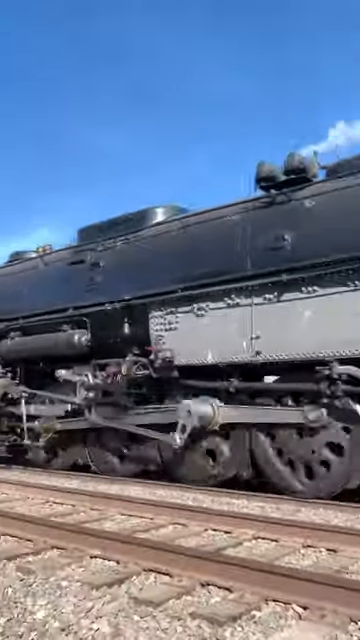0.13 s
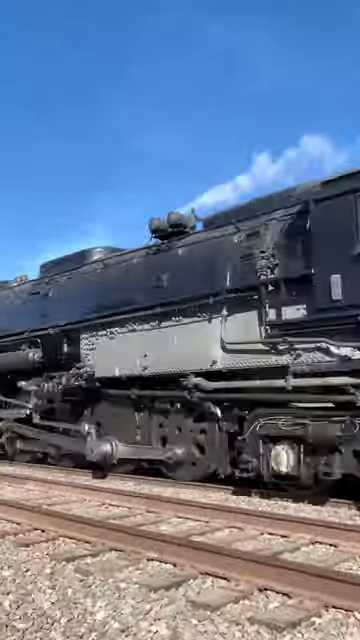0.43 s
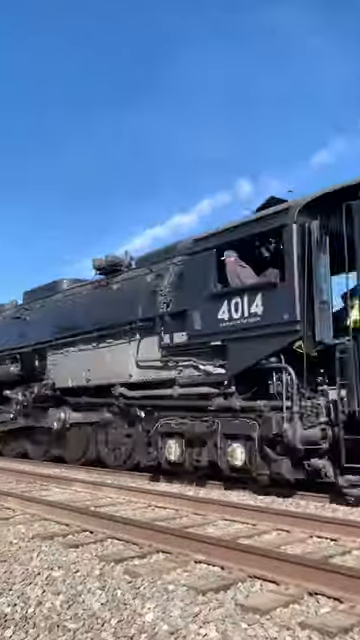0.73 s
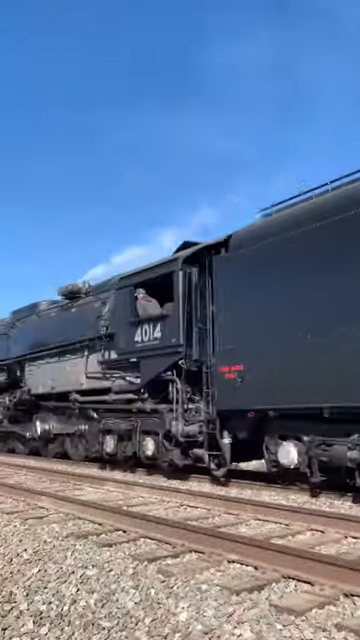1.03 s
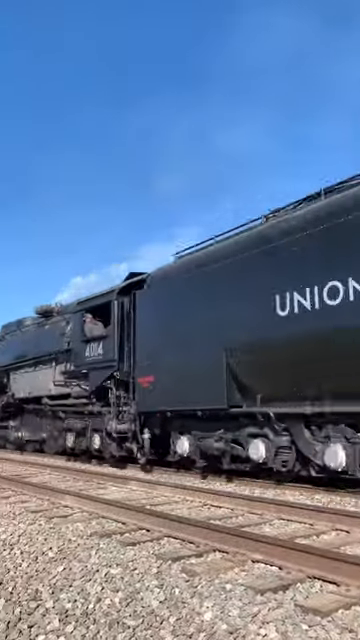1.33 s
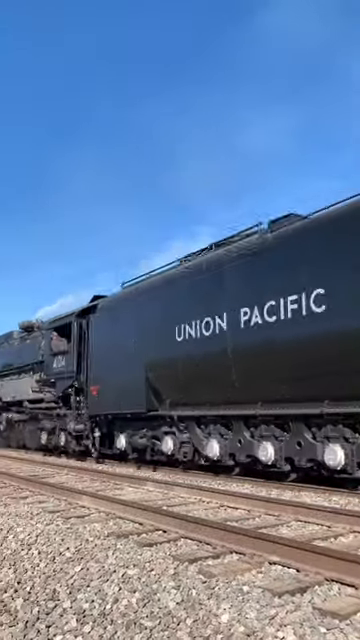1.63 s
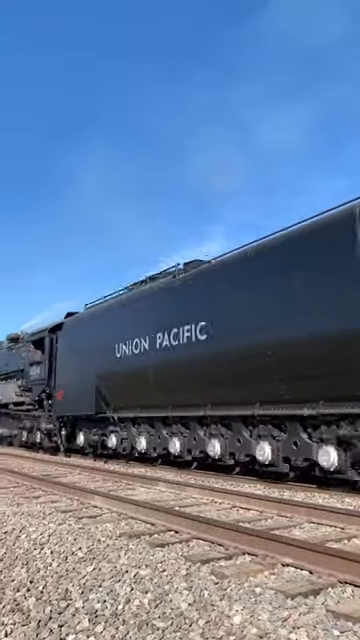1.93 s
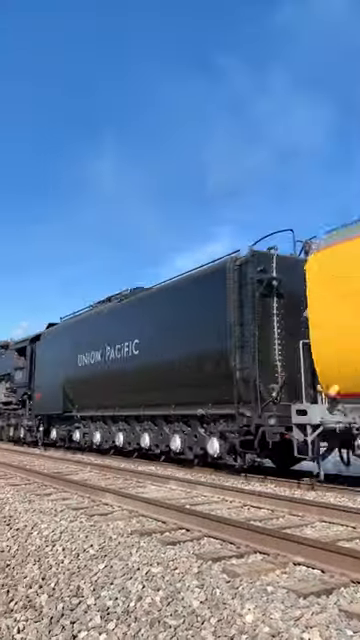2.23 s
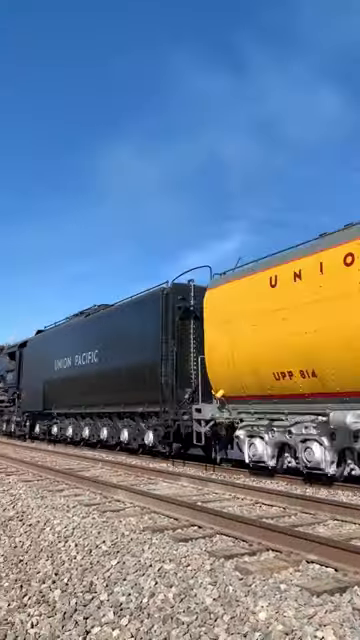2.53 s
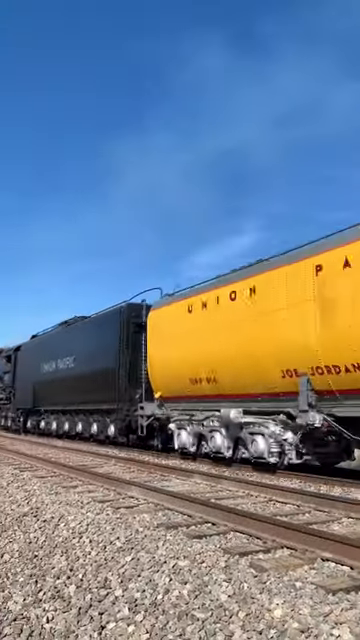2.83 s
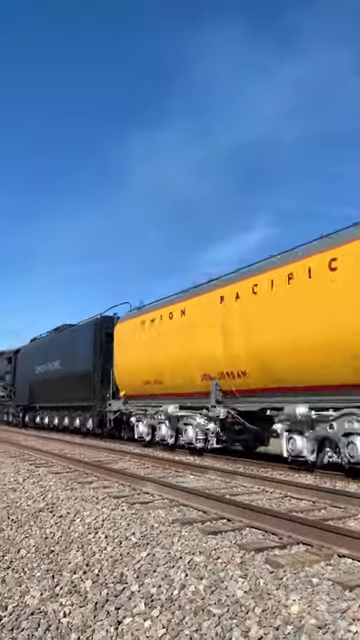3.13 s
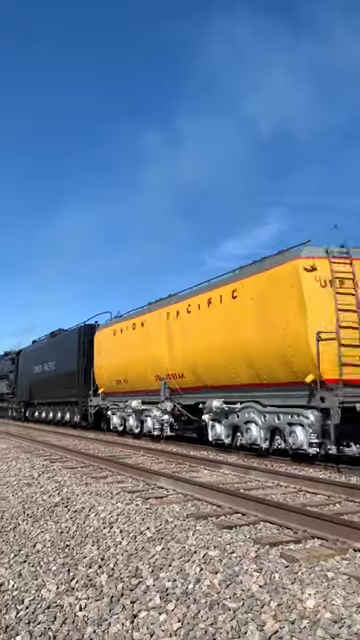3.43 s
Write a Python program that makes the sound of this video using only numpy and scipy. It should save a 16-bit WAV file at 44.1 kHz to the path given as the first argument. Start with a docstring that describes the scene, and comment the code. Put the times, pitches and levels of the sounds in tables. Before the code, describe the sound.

A steam train rolls past close by outdoors, in trackside stereo. During the first 0.9 seconds, sputtering, singing steam hiss and engine hum mix with ringing steel clanks. The hiss fades as wheels roar and rattle, with scraping scuffs every quarter second from 1.2 and a tiny high chirp at 1.8. From about 2.4, deep rumble swells with heavy axle thuds, dull knocks and grinding wheel thumps, strongest near 3.4.

```python
"""Steam train rolling past

A steam locomotive, its tender and a water car roll past close by, outdoors.
Shaped noise makes the rumble, the roar of the wheels and the hiss of steam; noise through narrow
resonances makes the steam sing and the engine hum. Short noise bursts that ring steel make the clanks.
Scuffs come round once per turn, a tiny chirp sounds, and heavy thumps and knocks gather near the end."""
import sys
import numpy as np
from scipy import signal
from scipy.fft import rfft, irfft
from scipy.io import wavfile
from scipy.ndimage import uniform_filter1d

SR = 44100
rng = np.random.default_rng(int(sys.argv[2]) if len(sys.argv) > 2 else 0)


def wav_out(sig):
    """Save sig, one row per channel (or a flat mono array), as 16-bit PCM at SR to the path in sys.argv[1]."""
    wavfile.write(sys.argv[1], SR, np.round(np.clip(np.atleast_2d(sig).T, -1, 1) * 32767).astype(np.int16))


N = 157878
T, HZ = np.arange(N) / SR, np.fft.rfftfreq(N, 1 / SR)
BELOW_TREBLE = np.exp(-(HZ / 3400) ** 8)  # 1 in the bass and middle, 0 in the treble


def amp(db):
    """Turns decibels into a gain."""
    return 10 ** (np.asarray(db) / 20)


def unit(x):
    """Scales a sound to an average (rms) strength of 1."""
    return x / np.sqrt(np.mean(x ** 2) + 1e-20)


def over_hz(points, hz=HZ):
    """Reads a table at every frequency, on a log-frequency axis."""
    f, value = np.transpose(points)
    return np.interp(np.log(hz + 1), np.log(f + 1), value)


def over_time(points):
    """Reads a table at every moment."""
    return np.interp(T, *np.transpose(points))


def colour(x, gain):
    """Filters by a gain per frequency, then scales to rms 1."""
    return unit(irfft(rfft(x) * gain, N))


def white():
    """Makes two unrelated noises."""
    return rng.standard_normal((2, N))


def wander(rate_hz):
    """Makes a slow random motion of rms 1."""
    coarse = rng.standard_normal(int(N / SR * 2 * rate_hz) + 8)
    knots = signal.resample_poly(coarse, up=4, down=1)
    return unit(np.interp(T * 8 * rate_hz, np.arange(len(knots)), knots))


def smooth_map(shape, bands, frames):
    """Makes random values that drift smoothly over frequency and time, of rms 1."""
    over_bands = uniform_filter1d(rng.standard_normal(shape), size=bands, axis=0)
    return unit(uniform_filter1d(over_bands, size=frames, axis=1))


def turbulence(spectrum, patchy_db, flutter_db, flutter_hz):
    """Makes coloured noise with drifting patches and a flutter shared by all bands."""
    z = signal.stft(white(), nperseg=512)[2]
    patches = smooth_map(z.shape[1:], bands=5, frames=8)
    x = signal.istft(z * amp(patchy_db * patches), nperseg=512)[1][:, :N]
    return unit(colour(x, amp(over_hz(spectrum))) * amp(flutter_db * wander(flutter_hz)))


def grit(spread_db):
    """Makes noise of very uneven strength, like dense tiny impacts."""
    return white() * amp(spread_db * np.clip(wander(1000), -2.5, 2.5))


def bell(centre, width):
    """Makes a smooth swell and fall; width is the standard deviation in s."""
    return np.exp(-.5 * ((T - centre) / width) ** 2)


def struck(start, rise, decay):
    """Shapes a blow: a quick rise, then a steady decay."""
    age = np.maximum(T - start, 0)
    return np.minimum(age / rise, 1) * np.exp(-np.clip((age - rise) / decay, 0, 60))


def singing(resonances, waver):
    """Rings noise in narrow resonances that waver together in pitch, each with its own level slope."""
    clock, out = T + waver * np.cumsum(wander(13)) / SR, 0
    drive = white()
    for hz, width, db, fade in resonances:
        turn = np.exp(2j * np.pi * hz * clock)
        r = np.exp(-1.5 * np.pi * width / SR)
        # shift the pitch down to zero, keep a narrow band, shift it back
        narrow = signal.lfilter([1], [1, -2 * r, r * r], drive * turn.conj())
        out = out + unit((turn * narrow).real) * amp(db - fade * T)
    return out


# Likeness of left and right channels: f/Hz, likeness (0-1)
LIKENESS = [(30, 0.99), (100, 1), (250, 0.94), (500, 0.76), (1200, 0.8), (2000, 0.61), (2800, 0.86),
            (3800, 0.38)]
# Likeness of left and right in the treble: f/Hz, likeness (0-1)
TREBLE_LIKENESS = [(4450, 1), (5300, 1), (6400, 0.6), (7400, 0.95), (8600, 0.5), (9150, 1), (10250, 1),
                   (11000, 0.5), (12400, 1), (13600, 0.55), (14100, 1)]
# How far the left channel leads: f/Hz, phase/rad
LEFT_LEAD = [(1550, 0), (2000, 2.1), (2800, 3.1), (3500, 3.6), (4400, 3.15), (5300, 3.15), (7200, 6.2),
             (9100, 9.4), (10300, 9.45), (11800, 12.55), (13000, 12.6), (14000, 15.7)]
# Extra lead for a source down the track: f/Hz, phase/rad per unit of bearing
BEARING_LEAD = [(30, 0.17), (200, 0.48), (450, 0.7), (750, 1.69), (1100, 0.91), (1600, 0.73), (2200, 0),
                (3000, 0)]
NEAR_BEARING = -1.22  # close by, on the other side (1 = down the track)


def ports(x, bearing):
    """Places two unrelated signals as one source, partly alike and shifted in phase between left and right."""
    a, b = rfft(x)
    same = np.clip(over_hz(LIKENESS + TREBLE_LIKENESS), 0, 1)
    lead = over_hz(LEFT_LEAD) + bearing * over_hz(BEARING_LEAD) * BELOW_TREBLE
    lead = lead * np.tanh((HZ / 300) ** 2)  # the phase shift dies out in the bass
    right = (same * a + np.sqrt(1 - same ** 2) * b) * np.exp(-1j * lead)
    return irfft(np.array([a, right]), N)


def shaking(spectrum):
    """Makes low noise of fairly even strength by partly levelling its swells."""
    x = colour(white(), amp(over_hz(spectrum)))
    strength = np.sqrt(uniform_filter1d(x[0] ** 2, size=3000) + 1e-6)
    return colour(x / strength ** 0.38, HZ < 900)


# Ground rumble over time: t/s, level/dB
RUMBLE_LEVEL = [(0, -29.5), (.4, -28.5), (1.1, -26.5), (1.6, -29), (2.05, -26.5), (2.45, -28), (2.8, -26),
                (3.05, -26.5), (3.3, -24.5), (3.58, -23)]
# Colour of the ground rumble: f/Hz, relative level/dB (per Hz)
RUMBLE_COLOUR = [(20, -38), (40, -38), (55, -1.5), (68, -2.5), (85, 1), (112, 1), (160, -8), (260, -26.5),
                 (600, -19)]
# Deepest boom over time: t/s, level/dB
BOOM_LEVEL = [(0, -26), (.35, -31), (1.2, -31), (1.7, -26), (1.95, -21.5), (2.2, -27.5), (2.75, -27.5),
              (3.58, -22)]
# Colour of the deepest boom: f/Hz, relative level/dB (per Hz)
BOOM_COLOUR = [(20, -50), (32, -43), (42, -13), (52, -5.5), (62, -14), (85, -20.5), (200, -79)]
# Heavy axles shoving the ground: t/s, level/dB (before THUD_TRIM_DB), f/Hz
AXLE_THUDS = [(1.091, -23, 86.4), (2.431, -14, 47.9), (2.554, -13, 64.5), (2.802, -13, 67.3),
              (2.902, -9, 56.5), (3.031, -14, 91.5), (3.164, -11.5, 67.1), (3.282, -13.5, 69.8),
              (3.414, -16, 74.4), (3.481, -14, 111.3), (3.546, -16, 130.8)]
THUD_WIDTH_S, THUD_TRIM_DB = 0.019, -2.5


def rumble():
    """The weight of the train shakes the track; each heavy axle shoves the ground for a few slow cycles."""
    ground = shaking(RUMBLE_COLOUR) * amp(over_time(RUMBLE_LEVEL))
    boom = shaking(BOOM_COLOUR) * amp(over_time(BOOM_LEVEL))
    thuds = 0
    for s, db, hz in AXLE_THUDS:
        wave = np.sin(2 * np.pi * (hz * T + rng.random()))
        thuds = thuds + amp(db + THUD_TRIM_DB) * bell(s, THUD_WIDTH_S) * wave
    return ports(ground + boom, bearing=0) + thuds


RATTLE_HITS_PER_S, RATTLE_DECAY_S, RATTLE_SPREAD_DB = 70, 0.012, 4  # hits of all pitches together


def rattle():
    """Loose steel parts chatter at random, each at its own pitch."""
    t, out = T[:3000], np.zeros((2, N))
    for hz in np.geomspace(350, 2600, num=24):
        happens = rng.random(N) < RATTLE_HITS_PER_S / 24 / SR
        hits = happens * amp(RATTLE_SPREAD_DB * np.minimum(rng.exponential(1, N), 3))
        wave = np.sin(2 * np.pi * (hz * t + rng.random((2, 1))))
        ring = np.exp(-t / RATTLE_DECAY_S) * wave / np.sqrt(hz)
        out += signal.oaconvolve(hits[None], ring, axes=1)[:, :N]
    return unit(out)


def resonant(x, depth_db):
    """Many narrow steel resonances come and go as parts move past."""
    z = signal.stft(x, nperseg=2048)[2]
    peaks = smooth_map(z.shape[1:], bands=2, frames=9)
    return unit(signal.istft(z * amp(depth_db * peaks), nperseg=2048)[1][..., :N])


# Roar of the car bodies over time: t/s, level/dB
BODY_LEVEL = [(0, -28.5), (.7, -30.5), (1.1, -29), (1.6, -32), (2.3, -31), (2.7, -26.5), (3.05, -25.5),
              (3.3, -22.5), (3.58, -25.5)]
# Colour of the body roar: f/Hz, relative level/dB (per Hz)
BODY_COLOUR = [(60, -65), (130, -14), (190, 1), (290, -1.5), (400, -3.5), (520, -5.5), (800, -12.5),
               (1500, -30), (4000, -61)]
# Wheels on the rails over time: t/s, level/dB (of the noise, without the rattle)
WHEEL_LEVEL = [(0, -25), (.3, -27), (.8, -28.5), (1.15, -28.5), (1.55, -30.5), (2, -30), (2.35, -31.5),
               (2.8, -29.5), (3.2, -29), (3.58, -27.5)]
# Colour of the wheels on the rails: f/Hz, relative level/dB (per Hz)
WHEEL_COLOUR = [(200, -14), (500, -1.5), (800, -3.5), (1200, 2), (1600, 0), (2100, -1.5), (2800, -0.5),
                (3300, -4.5), (4100, -4.5), (5200, -4.5), (7000, -14), (10000, -16.5), (13000, -24.5),
                (16000, -32)]
# Where the rolling sound comes from: t/s, share of its power from down the track (0-1)
AHEAD_SHARE = [(0, 0.94), (.6, 0.71), (1.8, 0.95), (2.4, 0.62), (2.9, 0.73), (3.58, 0.17)]
RATTLE_DB = -8  # against the wheel noise


def rolling():
    """Wheels roar and rattle on the rails, some down the track and some close by."""
    ahead, sounds = np.clip(over_time(AHEAD_SHARE), 0, 1), []
    for share in (ahead, 1 - ahead):
        body = turbulence(BODY_COLOUR, patchy_db=0.5, flutter_db=-0.5, flutter_hz=25.5)
        wheels = turbulence(WHEEL_COLOUR, patchy_db=2.74, flutter_db=0.43, flutter_hz=25.23)
        wheels = wheels + amp(RATTLE_DB) * rattle()
        mix = body * amp(over_time(BODY_LEVEL)) + wheels * amp(over_time(WHEEL_LEVEL))
        sounds.extend(np.sqrt(share) * mix)
    ringing = resonant(np.array(sounds), depth_db=3.5) * np.std(sounds)  # keeps the overall strength
    far, near = np.split(ringing, 2)
    return ports(far, bearing=0.88) + ports(near, NEAR_BEARING)


# Resonances of the working engine: f/Hz, width/Hz, level/dB at the start, fade/dB per s (minus = grows)
ENGINE_HUM = [(152.5, 21.4, -35.5, 1.5), (195.6, 20, -35.5, 3.5), (277.6, 19.4, -34, 6), (353, 56, -52, 19),
              (496, 18, -46, 3), (672, 25, -36.5, 4), (921, 26, -52, -2), (1176, 27, -49, 3),
              (1593, 67, -36, 4.5), (2300, 52, -37.5, 5.5), (2810, 330, -34, 15)]


def machinery():
    """Rods, frames and boiler hum with the motion; nearly all the tones fade as the engine draws away."""
    return ports(singing(ENGINE_HUM, waver=0.0088) * amp(2 * wander(12)), bearing=1.54)


# Steam hiss over time: t/s, level/dB
HISS_LEVEL = [(0, -34.5), (.25, -30.5), (.45, -32), (.8, -34), (1.1, -34.5), (1.27, -40.5), (1.45, -36.5),
              (1.59, -44.5), (1.69, -36.5), (1.87, -37.5), (2.15, -44.5), (2.31, -47), (2.55, -43.5),
              (2.8, -59), (3.58, -41.5)]
# Colour of the hiss: f/Hz, relative level/dB (per Hz)
HISS_COLOUR = [(1200, 4), (2800, -22), (4200, -2), (5500, 1), (7200, 8.5), (8600, 6.5), (10300, 4),
               (12000, 3.5), (13500, 3), (14600, -7), (16000, -7.5)]
# Resonances of the steam jet: f/Hz, width/Hz, relative level/dB, extra fade/dB per s (minus = grows)
JET_TONES = [(3740, 150, -11.5, 1), (3898, 194, -1.5, 1.5), (7220, 330, -15, -1), (7707, 103, -5.5, 0.5),
             (11520, 150, -5, 17)]
# Singing of the jet over time: t/s, level/dB (added to each tone's own)
JET_LEVEL = [(0, -40.5), (.42, -31.5), (.9, -33.5), (1.3, -37), (1.6, -39.5), (2.1, -40.5), (2.7, -45),
             (3.58, -72)]


def steam():
    """A sputtering jet of steam hisses and sings in a few narrow bands."""
    hiss = turbulence(HISS_COLOUR, patchy_db=1.8, flutter_db=1.1, flutter_hz=22)
    hiss = hiss * amp(over_time(HISS_LEVEL))
    song = singing(JET_TONES, waver=0.0018) * amp(over_time(JET_LEVEL) + 1.15 * wander(13))
    return ports(hiss + song, bearing=0.097)


# Running gear clanks: t/s, level/dB, rise/s, decay/s, drive of the ring/dB (against the blow),
# note f/Hz, note level/dB
GEAR_CLANKS = [(0.126, -22.5, .004, 0.045, -11, 927, -21), (0.169, -27, 0.0036, 0.032, -11, 530, -22),
               (0.19, -27.5, 0.0057, 0.019, -2, 397, -22), (0.206, -22.5, 0.005, 0.02, -7, 1166, -29),
               (0.388, -24, 0.0081, 0.023, -4, 1353, -22.5), (0.399, -19, 0.007, 0.03, -3.5, 681, -18.5),
               (0.441, -29, 0.0028, 0.018, -3, 495, -26), (0.608, -28.5, 0.0065, 0.022, -1, 1195, -22),
               (0.652, -31, 0.005, 0.018, 4, 672, -28), (0.698, -21.5, 0.006, 0.011, -4, 677, -26),
               (.884, -26, 0.0088, 0.056, -3.5, 520, -26)]
# Colour of the clatter: f/Hz, relative level/dB (per Hz)
CLANK_COLOUR = [(100, -4), (300, -0.5), (600, 3), (1000, -0.5), (1400, -0.5), (2200, -7.5), (4000, -11.5),
                (8000, -32), (15000, -40)]
# Ringing steel of the running gear: f/Hz, relative level/dB, time to fall by 60 dB (t/s)
STEEL_TONES = [(283, 0, 0.53), (500, -9, 0.27), (683, 2.5, 0.17), (940, -7.5, 0.43), (1180, -10, 0.2),
               (1350, -16, 0.1), (1495, -18, 0.19), (1600, -15, 0.18), (1910, -3, 0.24), (2085, -4, 0.39),
               (2300, -25, .3)]
STEEL_WAVER_HZ = 10.7  # the parts shift as they ring
NOTE_DECAY_S, NOTE_SAG_PER_S = .032, 0.32  # the note sags by this share of its pitch as the part moves past


def running_gear():
    """Each clank is a quick clatter that rings the struck part and, faintly or strongly, the gear's steel."""
    blows, drive, t = 0, 0, T[:SR // 2]
    clatter = colour(grit(spread_db=2.5), amp(over_hz(CLANK_COLOUR)))
    for start, db, rise, decay, ring_db, note_hz, note_db in GEAR_CLANKS:
        blow = amp(db) * struck(start, rise, decay) * clatter
        age = T - start
        turns = note_hz * age * (1 - NOTE_SAG_PER_S * age / 2) + rng.random((2, 1))
        note = amp(note_db) * struck(start, rise, NOTE_DECAY_S) * np.sin(2 * np.pi * turns)
        blows = blows + blow + note
        drive = drive + amp(ring_db) * blow
    steel = 0
    for hz, db, t60 in STEEL_TONES:
        turns = np.cumsum(hz + STEEL_WAVER_HZ * wander(40.0)[:len(t)]) / SR
        steel = steel + amp(db - 60 * t / t60) * np.sin(2 * np.pi * turns)
    ring = unit(signal.oaconvolve(drive, steel[None], axes=1)[:, :N]) * drive.std()
    return ports(blows + ring, bearing=0.55)


# Dull knocks of trucks and couplings: t/s, level/dB (before KNOCK_TRIM_DB)
KNOCK_TIMES = [(0.572, -20), (2.646, -21), (2.725, -22), (2.892, -12), (3.111, -16), (3.135, -15.5),
               (3.156, -15), (3.213, -15), (3.405, -7.5), (3.471, -14.5), (3.531, -20)]
# Colour of the knocks: f/Hz, relative level/dB (per Hz)
KNOCK_COLOUR = [(60, -3), (140, 6.5), (300, -2), (520, -2), (900, -10), (1600, -16), (2400, -22),
                (8000, -39)]
KNOCK_RISE_S, KNOCK_DECAY_S, KNOCK_TRIM_DB = 0.0024, 0.018, -4.5


def knocks():
    """Trucks and couplings knock dully as the wheels jolt: short bursts of low noise."""
    envelope = sum(amp(db + KNOCK_TRIM_DB) * struck(s, KNOCK_RISE_S, KNOCK_DECAY_S) for s, db in KNOCK_TIMES)
    return ports(envelope * colour(white(), amp(over_hz(KNOCK_COLOUR))), bearing=-0.21)


# Wheel scuffs, one per turn: t/s of the peak, level/dB
SCUFF_TIMES = [(1.17, -31.5), (1.42, -29.5), (1.68, -29.5), (1.925, -28.5), (2.172, -25.5), (2.41, -27),
               (2.66, -26), (2.905, -28), (3.16, -31), (3.41, -28)]
# Colour of the scraping: f/Hz, relative level/dB (per Hz)
SCUFF_COLOUR = [(120, -30), (300, 0.5), (800, 0), (1500, -1), (2600, -1.5), (4000, -4.5), (6000, -11),
                (9000, -25), (15000, -45)]
SCUFF_WIDTH_S = 0.034


def wheel_scuffs():
    """A swell of scraping comes round with each turn of the wheels."""
    envelope = sum(amp(db) * bell(s, SCUFF_WIDTH_S) for s, db in SCUFF_TIMES)
    scrape = turbulence(SCUFF_COLOUR, patchy_db=1.5, flutter_db=0.6, flutter_hz=90)
    return ports(envelope * scrape, bearing=-0.28)


SQUEAK_S, SQUEAK_HZ, SQUEAK_WIDTH_S, SQUEAK_DB = 1.801, 7560, 0.0081, -28.5


def squeak():
    """One tiny chirp of steel: a high steady tone that swells and dies at once."""
    return amp(SQUEAK_DB) * bell(SQUEAK_S, SQUEAK_WIDTH_S) * np.sin(2 * np.pi * SQUEAK_HZ * T)


# Thumps of a worn wheel: t/s of the peak, level/dB, grinding level/dB, decay/s
WORN_THUMPS = [(2.655, -25.5, -45, 0.035), (2.899, -23.5, -42, 0.057), (3.153, -20, -34, 0.056),
               (3.408, -19, -30.5, 0.1)]
# Colour of the thump: f/Hz, relative level/dB (per Hz)
THUMP_COLOUR = [(50, -5), (130, 6), (300, -1), (500, -2), (750, -4), (1200, -4.5), (1700, -5), (2300, -25),
                (5000, -13), (12000, -71)]
# Colour of the grinding: f/Hz, relative level/dB (per Hz)
GRIND_COLOUR = [(1500, -15), (4000, -6), (6500, 1), (9000, 3), (12500, 0.5), (14000, -2), (16000, -14)]
THUMP_RISE_S, GRIND_LEAD_S, GRIND_WIDTH_S = 0.028, 0.0067, 0.03  # the grinding peaks just before the thump


def worn_wheel():
    """A rough patch of tread grinds onto the rail, then thumps the truck."""
    thump, grind = 0, 0
    for s, thump_db, grind_db, decay in WORN_THUMPS:
        distance = np.maximum((s - T) / THUMP_RISE_S, (T - s) / decay)
        thump = thump + amp(thump_db) * np.exp(-distance)
        grind = grind + amp(grind_db) * bell(s - GRIND_LEAD_S, GRIND_WIDTH_S)
    thump = thump * colour(grit(spread_db=3.0), amp(over_hz(THUMP_COLOUR)))
    grind = grind * colour(grit(spread_db=4.0), amp(over_hz(GRIND_COLOUR)))
    return ports(thump + grind, NEAR_BEARING)


def scene():
    """Adds up the whole train at the trackside."""
    train = rumble() + rolling() + machinery() + steam() + running_gear()
    return train + knocks() + wheel_scuffs() + squeak() + worn_wheel()


# Difference between the microphones: f/Hz, left minus right level/dB
MIC_TILT = [(30, 1), (60, -0.7), (130, -2), (300, -1.5), (600, -1), (1100, -0.4), (2000, 0)]
LOW_CUT_HZ, CEILING, EDGE_HZ = 32, .72, 15600  # ceiling: largest sample size; edge: top of the band


def record(dry):
    """The microphones differ slightly below the treble; then a low cut, soft ceiling and band limit."""
    low_cut = 1 - 1 / (1 + (HZ / LOW_CUT_HZ) ** 6)
    tilt = amp(np.outer([.5, -.5], over_hz(MIC_TILT) * BELOW_TREBLE))
    heard = irfft(rfft(dry) * low_cut * tilt, N)
    heard = heard / (1 + (heard / CEILING) ** 6) ** (1 / 6)
    band_limit = signal.firwin(511, EDGE_HZ, window=("kaiser", 9), fs=SR)
    return signal.oaconvolve(heard, band_limit[None], "same")


dry = scene()
out = record(dry)
wav_out(out)
```